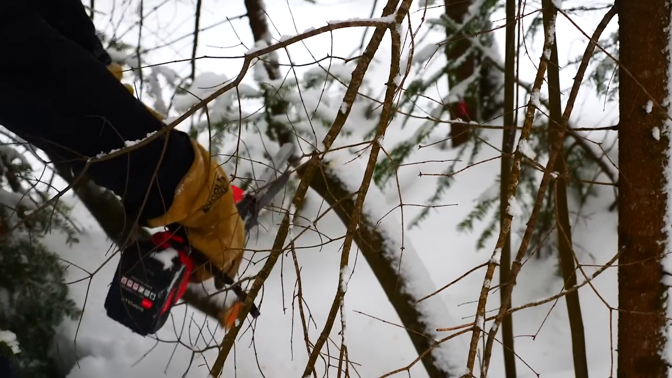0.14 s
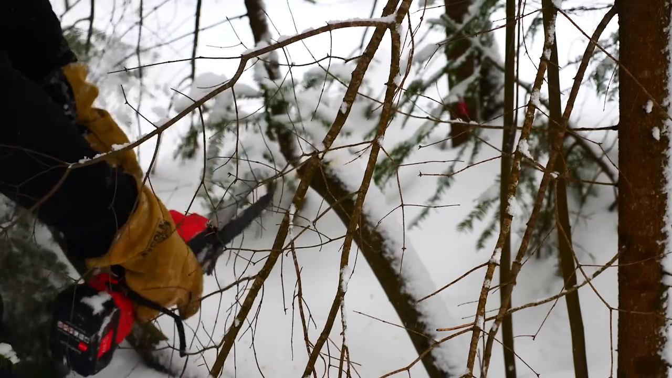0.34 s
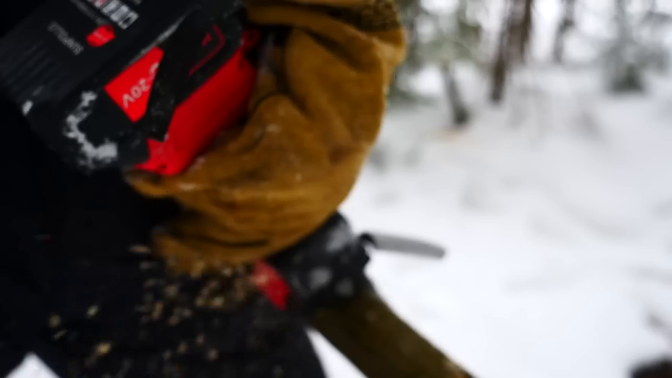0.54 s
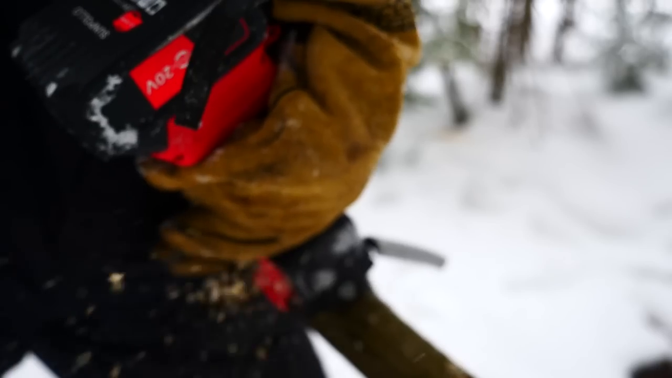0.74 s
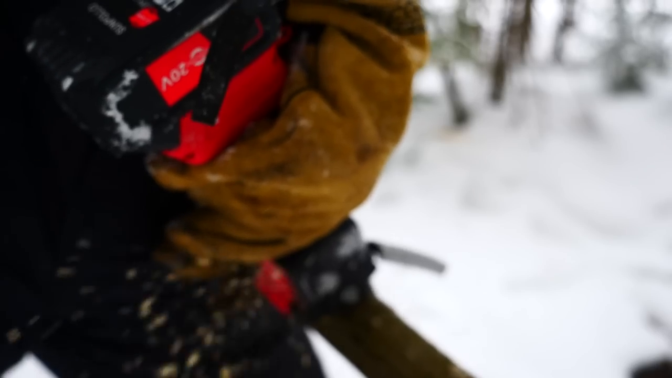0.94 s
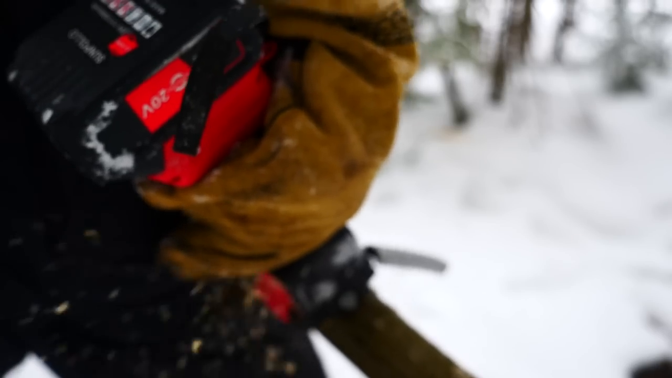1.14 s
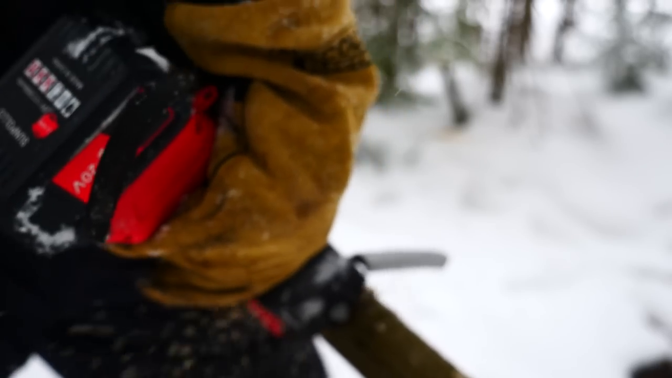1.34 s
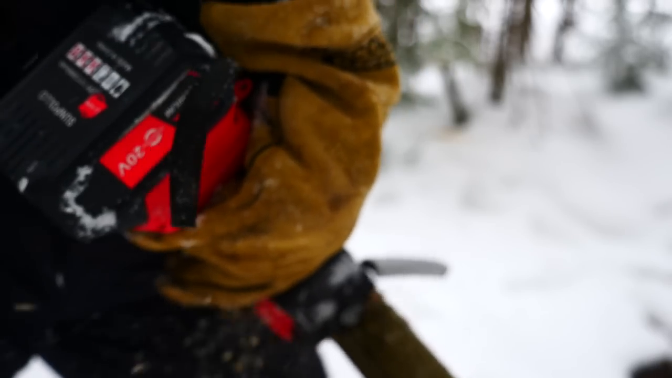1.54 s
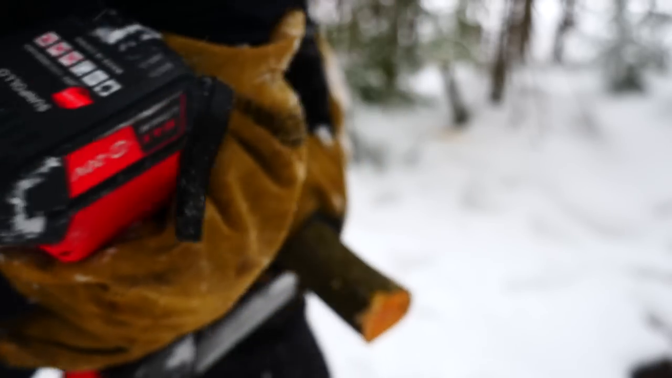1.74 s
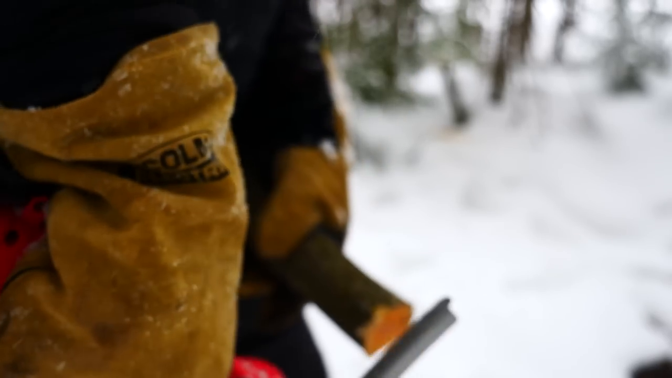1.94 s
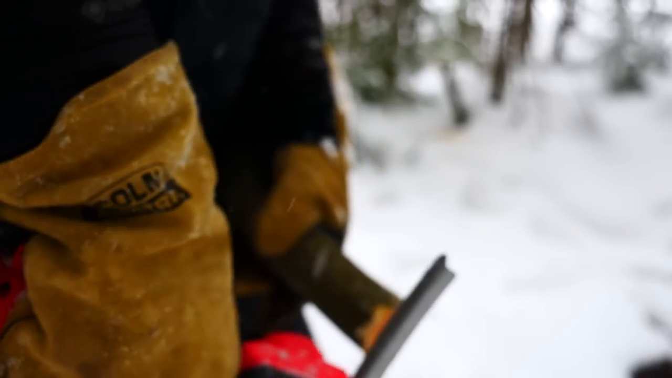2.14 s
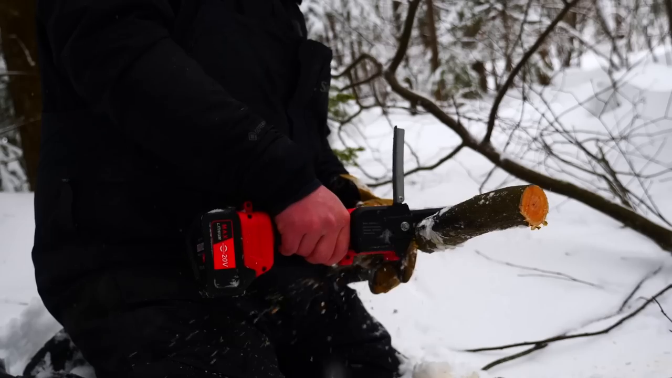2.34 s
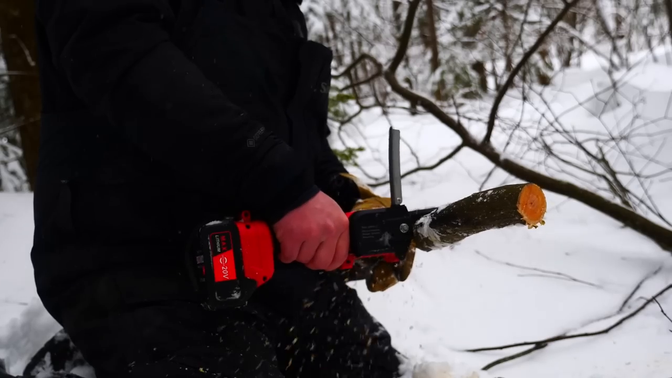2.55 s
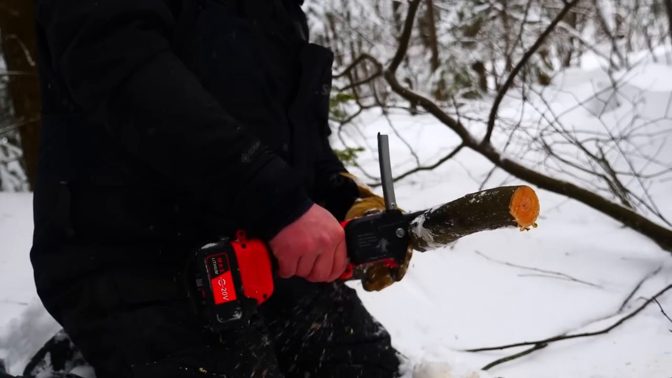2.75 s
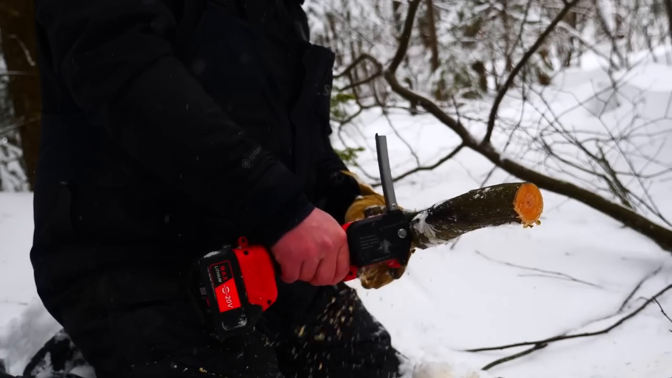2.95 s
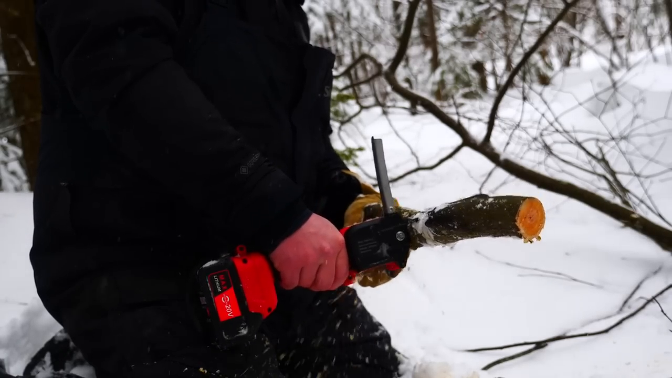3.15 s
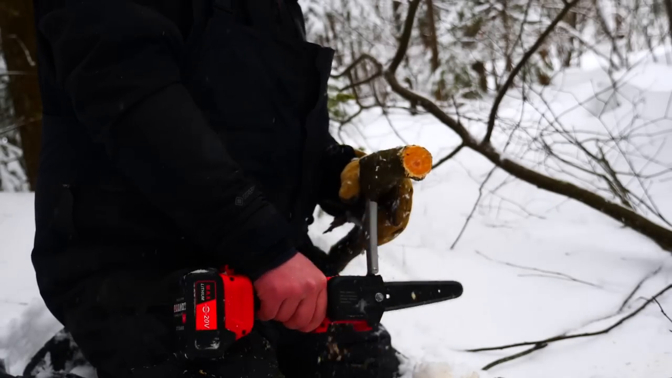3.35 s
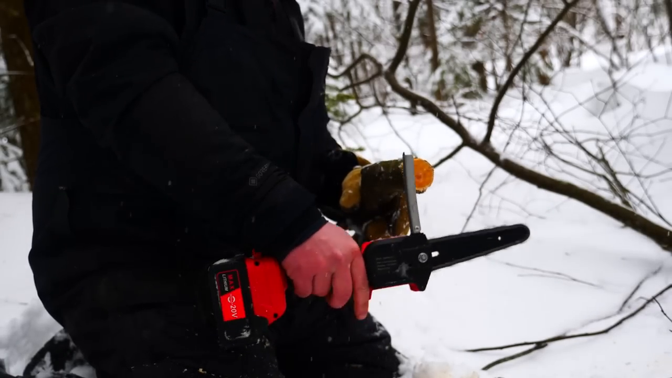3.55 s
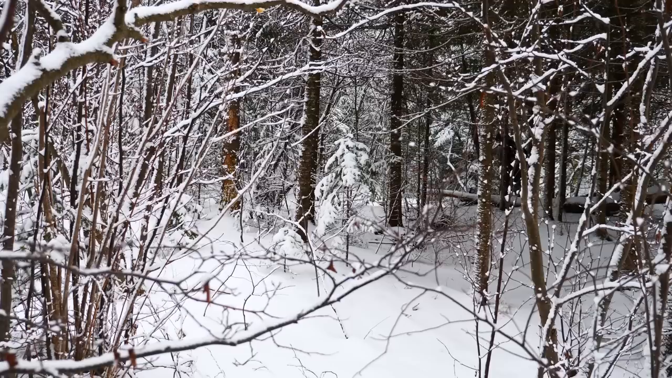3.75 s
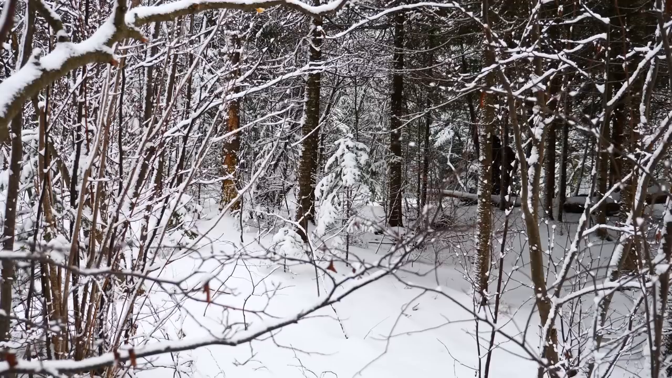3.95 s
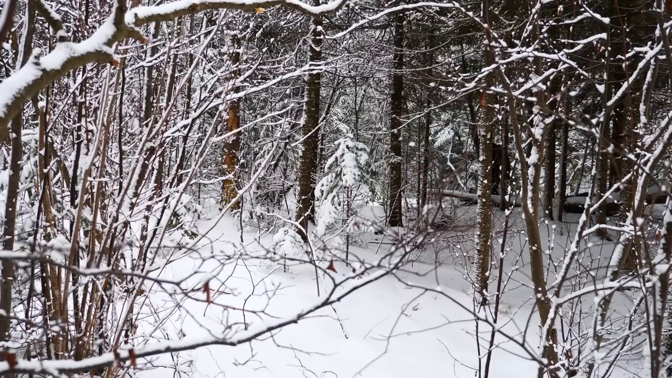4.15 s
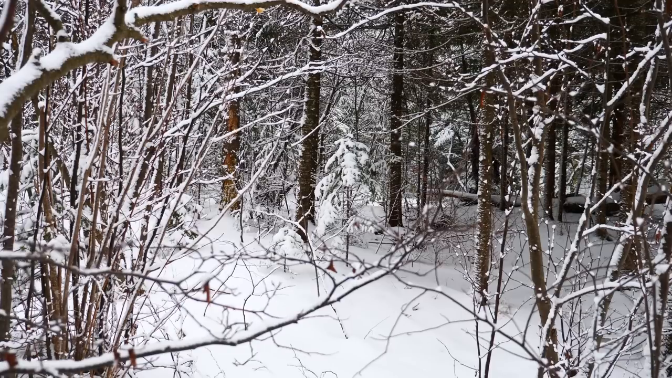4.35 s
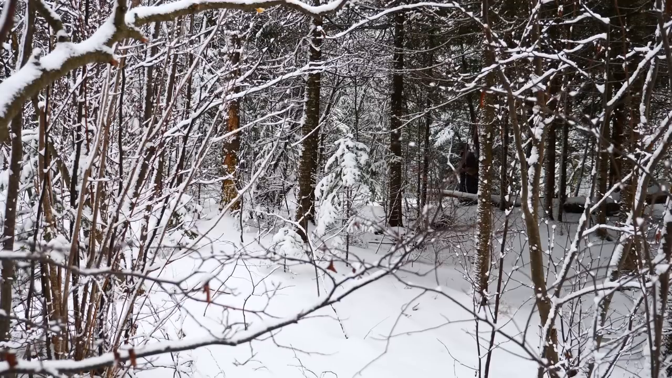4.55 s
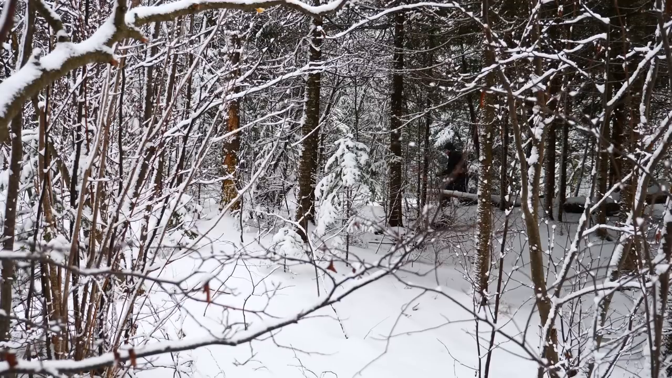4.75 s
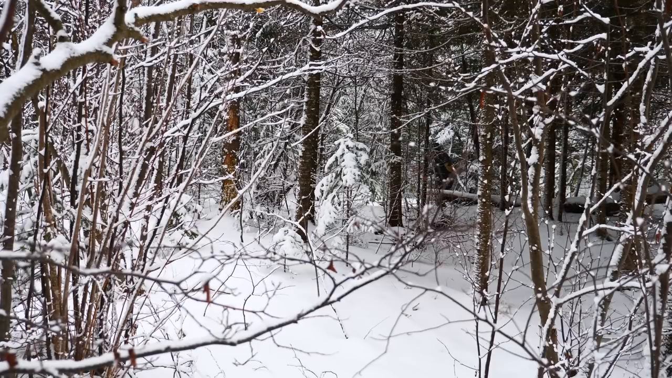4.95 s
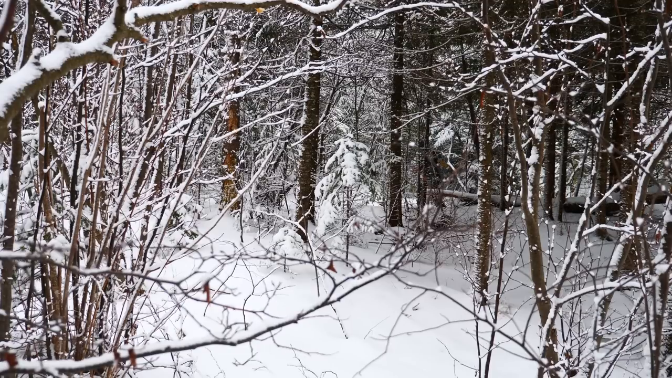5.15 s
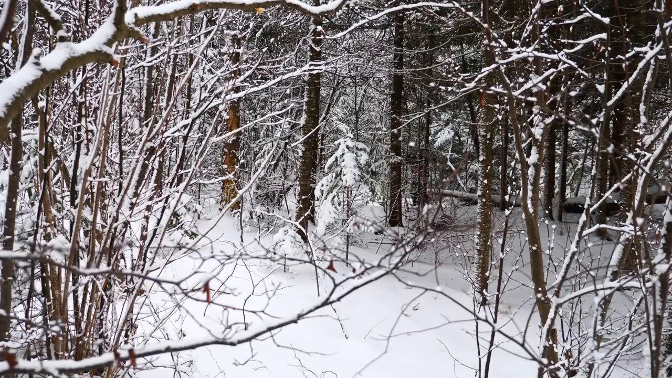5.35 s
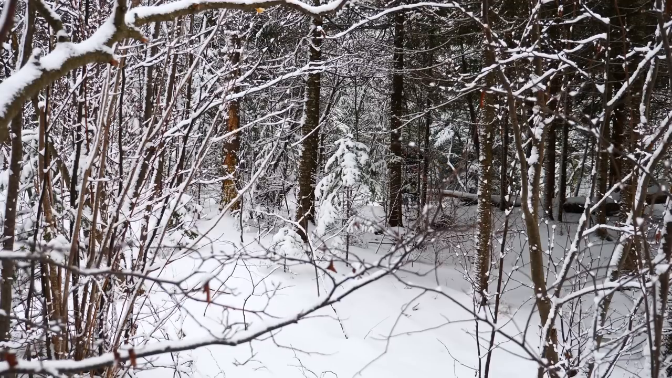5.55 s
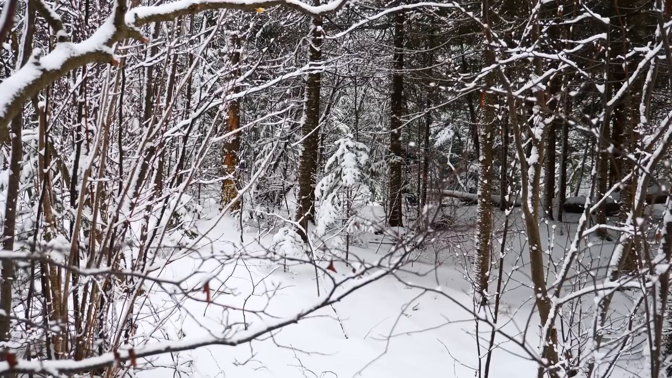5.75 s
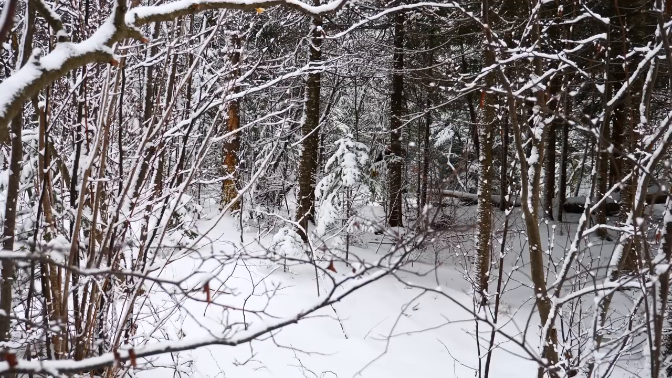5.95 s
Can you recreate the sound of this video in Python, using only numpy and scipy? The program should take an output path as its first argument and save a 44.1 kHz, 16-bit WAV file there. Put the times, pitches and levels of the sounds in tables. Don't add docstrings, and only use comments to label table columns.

```python
import sys
import numpy as np
from scipy import signal
from scipy.fft import rfft, irfft
from scipy.io import wavfile

SR = 44100
rng = np.random.default_rng(int(sys.argv[2]) if len(sys.argv) > 2 else 0)


def dump(signal):
    limited = np.clip(np.atleast_2d(signal).T, -1, 1)
    pcm = np.round(limited * 32767).astype(np.int16)
    wavfile.write(sys.argv[1], SR, pcm)


def gain_from_db(level_db):
    decades = np.asarray(level_db, float) / 20
    return 10 ** decades


N = 264600

# loudest [s], rise [s],
# fall to -20 dB [s], crunch level [dB], rustle level [dB].
STEPS = [(.008, .05, 0.0667, -42.5, -32), (0.063, 0.0216, 0.024, -36, -38),
         (.305, 0.0495, 0.22, -41.5, -35.5), (3.88, .05, 0.1144, -39, -40.5), (4.1, 0.29, 0.8, -36.5, -51),
         (4.41, 0.044, .4, -41, -50), (4.62, 0.28, 0.13, -41, -54), (4.76, 0.031, 0.05, -44.5, -52.5),
         (5.1, .04, 0.09, -45, -54), (5.17, .04, .25, -48, -61), (5.4, .16, .25, -42, -50),
         (5.63, .05, 0.03, -44.5, -53), (5.69, .12, .2, -40, -57), (5.82, 0.19, 0.43, -42, -60.5)]
# start [s], end [s], crunch level [dB], rustle level [dB].
SHUFFLE = [
    (0, .1, -45.5, -49),
    (.1, .26, -46, -51),
    (.26, .54, -45.5, -48.5),
    (2.2, 2.34, -50, -62),
    (3.85, 7, -49, -64),
]
# frequency [Hz], density [dB per Hz].
CRUNCH_COLOUR = [(120, -23), (200, 1.5), (389, -5), (502, -7.5), (765, -10), (1050, -11.5), (2500, -26.5),
                 (3250, -33), (5500, -120)]
# frequency [Hz], density [dB per Hz].
RUSTLE_COLOUR = [(710, -8), (1200, -0.5), (1670, -1), (3910, -7.5), (4490, -10), (6330, -18.5),
                 (13600, -26), (15600, -28)]
# time [s], level [dB], left minus right [dB].
WIND = [(0.0, -35.5, 2.5), (0.45, -35, 4), (0.84, -37, 2.5), (1.59, -31.5, 3), (1.85, -38, 6.5),
        (1.96, -28, 1), (2.19, -36, 5.5), (2.64, -33.5, 3), (3.02, -36, 5.5), (3.26, -41.5, 1),
        (3.34, -32.5, 2.5), (3.7, -37, 4), (4.61, -33, 1.5), (4.91, -34, 6), (5.33, -32.5, 5),
        (5.55, -30.5, 0.5), (5.97, -29.5, 1), (6.0, -48, 1.5)]
# frequency [Hz], density [dB per Hz].
BUFFET_COLOUR = [(11, -47), (18, -28.5), (38, -5), (59, -3.5), (128, -16.5), (215, -22), (297, -28.5),
                 (341, -26.5), (374, -33), (700, -50), (910, -79), (1540, -120)]
# time [s], peak [dB], ring [Hz].
SNAPS = [(.051, -27, 5230), (0.063, -26.5, 7440), (0.0638, -23, 598), (.099, -42.5, 5500),
         (0.124, -40, 4000), (0.411, -41, 3000), (.425, -34.5, 2500), (.532, -31, 2200), (4.1, -34.5, 696),
         (4.195, -26, 448), (4.271, -33.5, 905), (4.621, -29.5, 1000), (4.695, -36.5, 1100),
         (4.745, -39.5, 835), (5.098, -35, 874), (5.155, -30, 393), (5.179, -40.5, 1200), (5.82, -34, 900),
         (5.86, -37.5, 590), (5.898, -28.5, 537)]
# time [s], gear mesh [Hz], load [0-1].
BITES = [
    [(.552, 1970, .3), (.62, 1930, .3), (.76, 1910, .3), (.79, 2280, .4), (.95, 2190, .4), (1.05, 2295, .4),
     (1.22, 2270, .6)],
    [(1.345, 2470, .6), (1.42, 2300, .7), (1.445, 2480, .6), (1.475, 2250, .7), (1.52, 2380, .7),
     (1.59, 2430, .6), (1.64, 2280, .6), (1.668, 2030, .5), (1.7, 2540, .3)],
    [(2.337, 2500, .5), (2.36, 2270, .6), (2.47, 2280, .6), (2.52, 2160, .6), (2.545, 2350, .5),
     (2.56, 2750, .4), (2.585, 2820, .4), (2.6, 2300, .5), (2.645, 2300, .5)],
    [(2.69, 1950, .5), (2.8, 2060, .5), (2.875, 2220, .5), (2.96, 2300, .5), (3.0, 2520, .5),
     (3.08, 2090, .5), (3.14, 2120, .5), (3.215, 2200, .4), (3.25, 2400, .4)],
]
# free mesh [Hz], trigger released [s], coasting time constant [s],
# silent [s], rotor hum level [dB].
RACES = [
    (3050, 1.895, .15, 2.1, -28.5),
    (3200, 3.525, .24, 3.9, -36.5),
]
# multiple of rotor speed, level beside the hum [dB].
ROTOR_1 = [(1, -9.5), (2, -10), (3, 1)]
ROTOR_2 = [(1, 0), (2, -12), (3, -6)]
# start [s], end [s], mesh whine [dB], its octave [dB].
SINGING = [(.565, .58, -24, -36), (.605, .645, -23, -35), (.69, .705, -25, -36), (.75, .765, -26, -36),
           (.79, 1.0, -37, -32), (1.0, 1.16, -36, -32), (1.16, 1.25, -38, -38), (1.345, 1.44, -27, -53),
           (1.475, 1.65, -26, -53), (1.66, 1.675, -29, -53), (1.7, 1.895, -28, -47), (1.93, 1.98, -31, -52),
           (1.975, 2.035, -25.5, -52), (2.345, 2.54, -23.5, -41), (2.555, 2.585, -22.5, -45),
           (2.6, 2.645, -26, -45), (2.7, 2.82, -28, -40), (2.88, 3.0, -22.5, -50), (3.09, 3.135, -28, -46),
           (3.2, 3.25, -26, -44), (3.25, 3.31, -28.5, -50), (3.34, 3.41, -31, -56), (3.41, 3.52, -28, -56),
           (3.53, 3.65, -29.5, -55), (3.66, 3.8, -42, -55)]
# time [s], force [dB].
CHAIN_FORCE = [
    [(.553, -21.5), (.564, -19.5), (1.0, -19), (1.284, -19.5), (1.46, -22), (1.54, -19), (1.55, -23),
     (1.65, -19.5), (1.68, -18)],
    [(1.68, -20.5), (1.77, -16.5), (1.798, -25.5), (1.89, -20), (2.022, -28.5), (2.108, -38),
     (2.178, -49.5), (2.22, -70.5)],
    [(2.337, -19), (2.58, -17.5), (2.592, -23), (2.635, -17.5), (2.676, -21), (2.696, -19), (3.19, -19.5),
     (3.21, -16.5), (3.255, -22.5)],
    [(3.255, -29), (3.295, -26), (3.349, -27.5), (3.491, -25), (3.75, -38.5), (3.785, -39.5),
     (3.915, -56.5), (3.97, -81.5)],
]
# level at a force of -20 dB [dB], share of its swing.
CHAIN_ANSWERS = [
    [(-30, .4), (-22, 0.89), (-27, 1.1)],
    [(-34, .35), (-24, 0.523), (-20, 1.003)],
    [(-30, 0.37), (-21, 0.965), (-28.5, 1.08)],
    [(-34, 0.34), (-19, 0.672), (-20, 1.005)],
]
# frequency [Hz], density [dB per Hz].
CHAIN_COLOURS = [
    [(88, -43.5), (150, -12.5), (249, -3.5), (296, -6.5), (988, -2.5), (1770, -4.5), (2320, -1), (3300, -7),
     (4500, -10), (14200, -15.5), (15600, -18)],
    [(88, -44), (150, -11), (264, -9), (302, -14.5), (420, -10), (530, -15), (1570, 3), (2320, -3),
     (2880, -2.5), (3230, -5.5), (15600, -5.5)],
    [(88, -46.5), (150, -12), (463, -5.5), (541, -5), (1090, -7.5), (1430, -1), (1880, -5), (2280, -0.5),
     (6260, -15.5), (7750, -13.5), (15600, -17.5)],
    [(88, -47.5), (150, -12.5), (258, -3), (346, -14), (463, -10), (541, -14.5), (950, -4), (3110, -2.5),
     (6020, -10.5), (8220, -9), (15600, -12)],
]
# frequency [Hz], width [Hz], height above the colour [dB].
CHAIN_RINGS = [
    [(1000, 100, 4), (1350, 478, 5), (2309, 200, 0), (2880, 100, 6.5), (3936, 270, 4.5), (4506, 150, 2.5),
     (7007, 260, 4), (3260, 130, -2), (11670, 830, -4)],
    [(1560, 170, 1), (14500, 3000, 0), (2790, 370, 2.5), (3805, 330, 6.5), (4500, 77, 8), (8060, 1300, 5.5)],
    [(448.9, 76, 7.5), (1450, 270, 0), (2350, 200, -3), (2873, 92, 3), (4000, 99, 4), (4430, 79, 3.5),
     (7837, 2000, 7.5), (10600, 1200, -5)],
    [(1350, 330, 4.5), (2685, 200, 4.5), (3892, 260, 6.5), (4386, 200, 3), (8270, 3460, 8.5),
     (10670, 1500, -3), (1974, 300, 1.5)],
]
# time [s], peak [dB], ring
# [Hz].
SNAGS = [(0.557, -16.5, 2000), (0.603, -3, 1920), (0.628, -8, 1980), (0.694, -9, 1114),
         (0.751, -3.5, 1860), (0.807, -9.5, 1020), (0.844, -12.5, 974), (0.917, -11, 1010),
         (0.973, -1.5, 1046), (1.067, -5.5, 1640), (1.101, -8.5, 1330), (1.18, -7, 1350),
         (1.21, -16, 2880), (1.257, -10.5, 1080), (1.275, -6, 1450), (1.323, -4, 2030),
         (1.344, -9.5, 2460), (1.377, -6.5, 2310), (1.483, -8, 2240), (1.535, -3, 2190),
         (1.561, -11.5, 2340), (1.71, -12, 1960),
         (2.336, -13.5, 2490), (2.351, -9, 2260), (2.464, -5, 2220), (2.529, -7.5, 1440),
           (2.557, -3.5, 1560), (2.619, -20.5, 2390), (2.636, -5, 1300), (2.699, -4, 1470),
           (2.748, -17.5, 1540), (2.765, -10, 2030), (2.798, -8, 1420), (2.859, -14, 2020),
           (2.883, -5.5, 2180), (2.944, -7, 1540), (3.018, -17.5, 3190), (3.038, -4, 1490),
           (3.125, -3, 1430), (3.212, -3.5, 2230), (3.296, -10, 1550)]
# time [s], peak [dB].
KNOCKS = [(1.259, -14.5), (1.289, -15.5), (1.321, -8.5), (1.339, -15), (1.377, -10), (1.434, -14.5),
          (1.534, -15.5), (1.629, -14.5), (1.659, -19.5), (2.369, -16), (3.102, -15.5), (3.149, -17.5),
          (3.209, -17.5)]
# time [s], peak [dB].
CHIPS = [(0.5514, -15), (0.7813, -12), (0.8906, -10), (0.9749, -10), (1.0008, -11), (1.1061, -12),
         (1.129, -10), (1.157, -11), (1.2582, -10), (1.3241, -10), (1.367, -11), (1.4089, -14),
         (1.5221, -12), (1.6818, -10),
         (2.3358, -17), (2.3493, -11), (2.3723, -12), (2.4631, -11), (2.5094, -13), (2.5294, -12),
           (2.6945, -13), (2.7464, -12), (2.7654, -14), (2.8103, -13), (2.8596, -16), (2.8771, -15),
           (2.944, -11), (3.0462, -12), (3.1265, -9), (3.1809, -12), (3.2109, -12), (3.2752, -14)]
TICKS = [
    (2.1694, -33),
    (2.1834, -33),
    (2.1994, -38),
]
# time [s], peak [dB].
JOLTS = [(0.604, -7), (0.844, -8), (0.973, -2), (1.067, -6), (1.128, -10), (1.156, -9), (1.215, -9),
         (1.258, -7), (1.323, -5), (1.378, -7), (1.434, -12), (1.521, -8), (1.536, -6), (2.463, -7),
         (2.529, -6), (2.555, -6), (2.562, -4), (2.574, -6), (2.581, -8), (2.636, -6), (2.649, -8),
         (2.698, -8), (2.711, -8), (2.882, -7), (2.945, -6), (3.044, -5), (3.125, -6), (3.211, -4)]
# frequency [Hz], level [dB], time to -60 dB [s].
HOUSING_MODES = [(1000, -2, .025), (1480, 0, .025), (2250, -3, .02), (2900, -2, .025), (3900, -7, .02),
                 (5200, -9, .012)]
# loudest [s], rise [s], fall to -20 dB [s], resonance [Hz], level [dB].
CHATTER = [(.74, .12, .06, 1250, -27), (.86, .15, .2, 1000, -31), (1.22, .08, .15, 2900, -30),
           (1.36, .1, .06, 1200, -29), (1.88, .05, .05, 900, -30), (2.03, .06, .05, 1550, -30),
           (2.39, .05, .15, 1430, -27), (2.4, .06, .25, 700, -31), (2.41, .07, .4, 4480, -32),
           (2.53, .04, .08, 1360, -25), (2.71, .06, .06, 1460, -26), (2.81, .05, .1, 1450, -25),
           (2.82, .06, .05, 4000, -30), (3.13, .08, .08, 1450, -27), (3.47, .1, .08, 2750, -28)]
# time [s], peak [dB], bright tick peak [dB].
CREEP = [(2.2164, -31, -51.5), (2.2215, -25, -41.5), (2.23, -29, -44), (2.246, -21.5, -39.5),
         (2.2624, -22.5, -44), (2.279, -23, -40.5), (2.2825, -33, -44.5), (2.295, -25.5, -42),
         (2.3084, -19, -42), (2.3138, -29.5, -45), (2.3238, -21.5, -39)]

STILL_AIR_DB, HISS_DB, CUTOFF_HZ = -60.5, -69.5, 15720
MESH_PER_TURN, MESH_PER_LURCH = 6.75, 50
SPIN_UP_S, FREE_LOAD = .09, .1
HUM_DB_PER_OCTAVE, HUM_AT_HZ = 34, 3000
SING_FADE_DB_PER_S, MUTED_DB = 1100, -46
WOOD_TOP_HZ, LINK_LOW_HZ = 900, 5000
CHATTER_WIDTH_HZ = 130


def rms_one(x):
    return x / np.sqrt(np.mean(x ** 2) + 1e-20)


def in_time(rows):
    s, *columns = np.transpose(rows)
    t = np.arange(N) / SR
    gate = np.clip(np.minimum(t - s[0], s[-1] - t) / .002 + 1, 0, 1)
    return [np.interp(t, s, c) for c in columns] + [gate]


def slowly(rule):
    t = np.arange(0, N / SR + .001, .001)
    return [np.interp(np.arange(N) / SR, t, row) for row in rule(t)]


def drift(rate):
    r = np.exp(-40 * np.pi * rate / SR)
    slow = signal.lfilter([1], [1, -2 * r, r * r], rng.standard_normal(N // 20 + 2002))[2000:]
    return np.interp(np.arange(N) / 20, np.arange(len(slow)), rms_one(slow))


def colour(x, spectrum, rings=()):
    size = 8192
    hz = np.maximum(np.arange(size // 2 + 1) * SR / size, 1)
    table_hz, table_db = np.transpose(spectrum)
    db = np.interp(np.log(hz), np.log(table_hz), table_db)
    for ring_hz, width, top_db in rings:
        db = db + top_db / (1 + (2 * (hz - ring_hz) / width) ** 2)
    cepstrum = irfft(np.log(gain_from_db(db)))
    cepstrum[1:size // 2] *= 2
    cepstrum[size // 2 + 1:] = 0
    return rms_one(signal.fftconvolve(x, irfft(np.exp(rfft(cepstrum))))[:N])


def grains(per_s, spread_db, smooth):
    sizes = gain_from_db(spread_db * np.minimum(rng.exponential(1, N), 4)) * rng.choice([-1, 1], N)
    return rms_one(sizes * (rng.random(N) < per_s / SR)) + smooth * rng.standard_normal(N)


def band(x, low_hz, high_hz):
    sos = signal.butter(2, [low_hz, min(high_hz, .45 * SR)], "band", fs=SR, output="sos")
    return signal.sosfilt(sos, x)


def steep_band(x, low_hz, high_hz):
    return band(band(x, low_hz, high_hz), low_hz, high_hz)


def add(out, s, db, burst):
    i = round(s * SR)
    out[i:i + len(burst)] += (gain_from_db(db) * burst / np.max(abs(burst)))[:N - i]


def puff(t60, low_hz, high_hz):
    t = np.arange(1800) / SR
    return steep_band(rng.standard_normal(len(t)) * gain_from_db(-60 * t / t60), low_hz, high_hz)


def swell(t, peak_s, rise_s, fall_s):
    return -20 * np.maximum((peak_s - t) / rise_s, (t - peak_s) / fall_s)


def tread(t):
    power = 0
    for s, rise, fall, crunch_db, rustle_db in STEPS:
        power = power + gain_from_db(2 * (np.array([[crunch_db], [rustle_db]]) + swell(t, s, rise, fall)))
    for s0, s1, crunch_db, rustle_db in SHUFFLE:
        power = power + gain_from_db(2 * np.array([[crunch_db], [rustle_db]])) * (t >= s0) * (t <= s1)
    return np.sqrt(power)


def steps():
    crunch = colour(gain_from_db(1.95 * drift(26)) * grains(900, spread_db=3.5, smooth=0.98), CRUNCH_COLOUR)
    rustle = colour(gain_from_db(0.64 * drift(40)) * grains(1500, spread_db=5.0, smooth=1.14), RUSTLE_COLOUR)
    still_air = gain_from_db(STILL_AIR_DB) * colour(rng.standard_normal(N), RUSTLE_COLOUR)
    crunch_gain, rustle_gain = slowly(tread)
    return still_air + crunch_gain * crunch + rustle_gain * rustle


def wind():
    level_db, pan_db, gate = in_time(WIND)
    shared = rng.standard_normal(N)
    ports = []
    for side in range(2):
        turbulence = rng.standard_normal(N) + .4 * shared
        ports.append(colour(gain_from_db(2.11 * drift(6.8)) * turbulence, BUFFET_COLOUR))
    return gain_from_db(level_db + 2.5 + pan_db * np.array([[.5], [-.5]])) * ports


def snaps():
    out = np.zeros(N)
    for s, db, hz in SNAPS:
        add(out, s, db + 1.2, puff(0.02, 0.458 * hz, 1.29 * hz))
        add(out, s, db - 8 + 18 * np.log10(hz / 5000), puff(.01, 900, 15000))
    return out


def saw():
    chip_swells = signal.lfilter([1], [1, -.975], abs(grains(140, spread_db=2.5, smooth=0)))
    chips = rms_one(chip_swells * band(rng.standard_normal(N), 2500, 16000))
    bounce = gain_from_db(.85 * drift(19.7) + 1.5 * drift(110))
    biting = bounce * grains(4000, spread_db=4.0, smooth=1.304) + 0.38 * chips
    free = gain_from_db(0.67 * drift(60)) * grains(7000, spread_db=2.0, smooth=1.48) + 0.16 * chips
    hails = [biting, free, biting, free]
    stretches = zip(CHAIN_FORCE, CHAIN_ANSWERS, CHAIN_COLOURS, CHAIN_RINGS, hails)
    chains = sum(chain(*stretch) for stretch in stretches)
    first = motor(BITES[0] + BITES[1], RACES[0], ROTOR_1)
    second = motor(BITES[2] + BITES[3], RACES[1], ROTOR_2)
    return chains + first + second


def singing(t):
    spells = []
    for s0, s1, whine_db, octave_db in SINGING:
        outside_s = np.maximum(0, np.maximum(s0 - t, t - s1))
        spells.append(np.array([[whine_db], [octave_db]]) - SING_FADE_DB_PER_S * outside_s)
    return np.max(spells, axis=0)


def motor(cut, race, rotor):
    free_hz, release_s, coast_s, silent_s, top_hum_db = race
    mesh_hz, load, gate = in_time(cut + [(silent_s, *cut[-1][1:])])
    t = np.arange(N) / SR
    freed = 1 - np.exp(-np.maximum(t - cut[-1][0], 0) / SPIN_UP_S)
    coasting = np.exp(-np.maximum(t - release_s, 0) / coast_s)
    mesh_hz = (mesh_hz + freed * (free_hz - mesh_hz)) * coasting
    load = load + freed * (FREE_LOAD - load)
    whine_db, octave_db = slowly(singing)
    hum_db = top_hum_db + HUM_DB_PER_OCTAVE * np.log2(mesh_hz / HUM_AT_HZ)

    wander = (.002 + .02 * load) * drift(45)
    lurch_phase = 2 * np.pi * np.cumsum(mesh_hz) / SR / MESH_PER_LURCH + 1.5 * drift(8)
    lurch = .03 * load * np.sin(lurch_phase)
    mesh = 2 * np.pi * np.cumsum(mesh_hz * (1 + wander + lurch)) / SR

    whine_db = np.maximum(whine_db, MUTED_DB) - 2.5 * (1 - load) + (1.2 + 1.5 * load) * drift(45)
    whine = gain_from_db(whine_db) * np.sin(mesh)
    octave = gain_from_db(octave_db - 1 + 3.5 * drift(45)) * np.sin(2 * mesh)
    hum = 0
    for order, db in rotor:
        hum = hum + gain_from_db(hum_db + db - 12 * load + 2 * drift(40)) * np.sin(order * mesh / MESH_PER_TURN)
    return np.sqrt(2) * gate * (whine + octave + hum)


def chain(force, answers, spectrum, rings, hail):
    force_db, gate = in_time(force)
    wood_db, housing_db, link_db = (db + share * (force_db + 20) for db, share in answers)
    body = colour(hail, spectrum, rings)
    wood = rms_one(signal.sosfilt(signal.butter(4, WOOD_TOP_HZ, fs=SR, output="sos"), body))
    links = rms_one(signal.sosfilt(signal.butter(4, LINK_LOW_HZ, "high", fs=SR, output="sos"), body))
    housing = rms_one(steep_band(body, WOOD_TOP_HZ, LINK_LOW_HZ))
    return gate * (gain_from_db(wood_db) * wood + gain_from_db(housing_db - 0.5) * housing + gain_from_db(link_db) * links)


def chips():
    out = np.zeros(N)
    for s, db in CHIPS + TICKS:
        add(out, s, db - 1.5, puff(.012, 4000, 15500))
    return out


def snags():
    out = np.zeros(N)
    for s, db, hz in SNAGS:
        add(out, s, db - 7.5, puff(0.023, 0.571 * hz, 1.57 * hz))
        add(out, s, db - 9.5, puff(0.018, 300, 13000))
        add(out, s, db - 15, puff(0.038, 180, 990))
    return out


def chatter():
    rub = gain_from_db(2.5 * drift(35)) * rng.standard_normal(N)
    out = np.zeros(N)
    half = CHATTER_WIDTH_HZ / 2
    for s, rise, fall, hz, db in CHATTER:
        i = np.arange(round((s - 2 * rise) * SR), round((s + 2 * fall) * SR))
        out[i] += gain_from_db(db + swell(i / SR, s, rise, fall)) * rms_one(band(rub[i], hz - half, hz + half))
    return out


def jolts():
    out = np.zeros(N)
    t = np.arange(1800) / SR
    for s, db in JOLTS:
        ring = 0
        for hz, mode_db, t60 in HOUSING_MODES:
            decay = gain_from_db(mode_db + rng.normal(0, 3) - 60 * t / t60)
            ring = ring + decay * np.sin(2 * np.pi * hz * rng.uniform(.96, 1.04) * t)
        add(out, s, db - 1.5, ring)
    return out


def knocks():
    out = np.zeros(N)
    for s, db in KNOCKS:
        add(out, s, db - 3, puff(.06, 200, 900))
    return out


def drag(peak_s, rise_s, fall_s, hz, db, width_hz):
    t = np.arange(N) / SR
    rub = band(grains(1500, spread_db=3.0, smooth=.6), hz - width_hz / 2, hz + width_hz / 2)
    return gain_from_db(db + swell(t, peak_s, rise_s, fall_s)) * rms_one(rub)


def bar_ring():
    return drag(peak_s=2.12, rise_s=.3, fall_s=.17, hz=1520, db=-33.5, width_hz=200)


def creep():
    out = np.zeros(N)
    for s, db, tick_db in CREEP:
        add(out, s, db + 1.5, puff(0.03, 862, 2020) + puff(0.0252, 1655, 4270))
        add(out, s, tick_db + 1.5, puff(0.007, 7600, 12000) + .3 * puff(0.004, 4500, 15500))
    return out


def swish():
    return drag(peak_s=5.41, rise_s=.15, fall_s=.12, hz=1400, db=-47, width_hz=700)


def scene():
    ground = steps() + wind() + snaps()
    cutting = saw() + chips() + snags() + chatter() + jolts() + knocks()
    return ground + cutting + bar_ring() + creep() + swish()


def roll_off(x):
    return signal.sosfilt(signal.butter(12, 16460, fs=SR, output="sos"), x)


def record(dry):
    hiss = gain_from_db(HISS_DB) * signal.lfilter([1], [1, -.6], rng.standard_normal(dry.shape))
    rounded = .95 * np.tanh((dry + hiss) / .95)
    mix = signal.sosfilt(signal.ellip(12, .5, 75, CUTOFF_HZ, fs=SR, output="sos"), rounded)
    return roll_off(mix)


dry = scene()
out = record(dry)
dump(out)
```